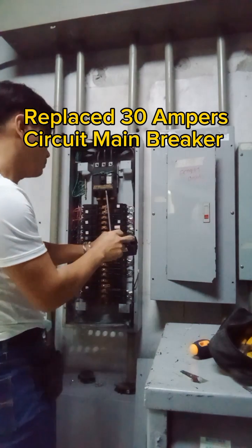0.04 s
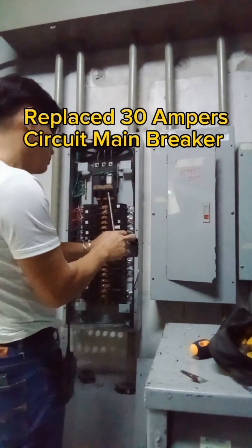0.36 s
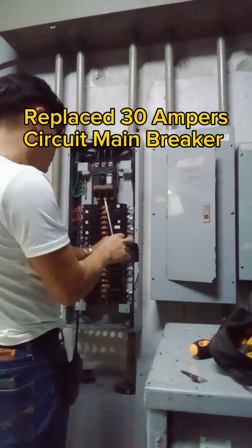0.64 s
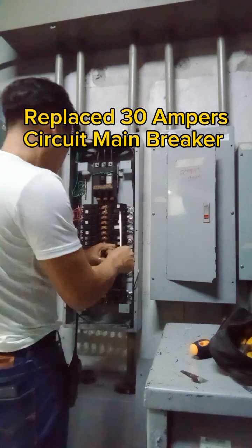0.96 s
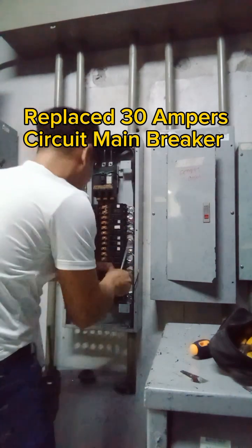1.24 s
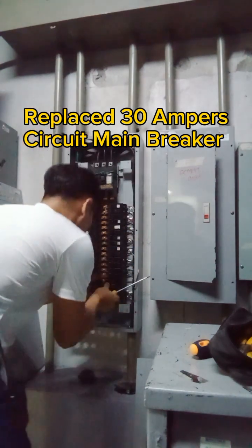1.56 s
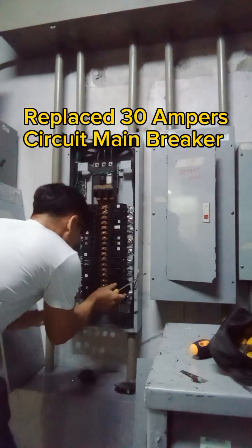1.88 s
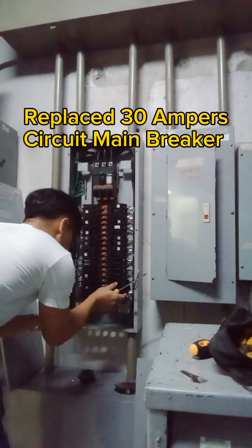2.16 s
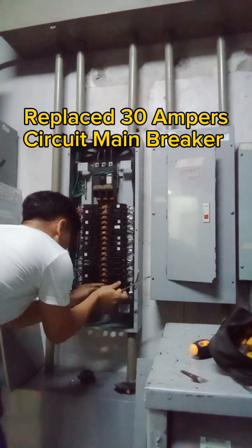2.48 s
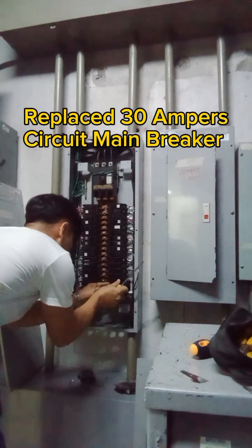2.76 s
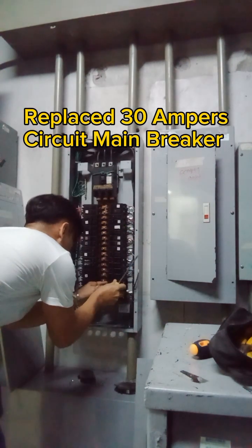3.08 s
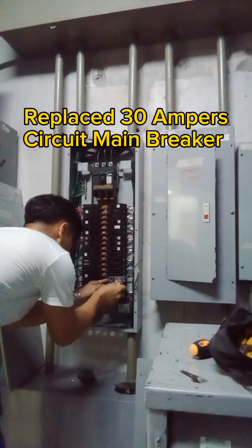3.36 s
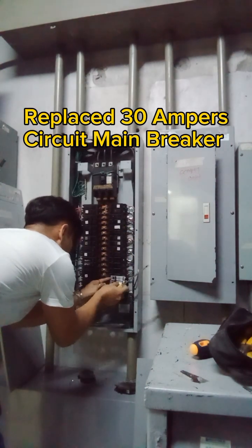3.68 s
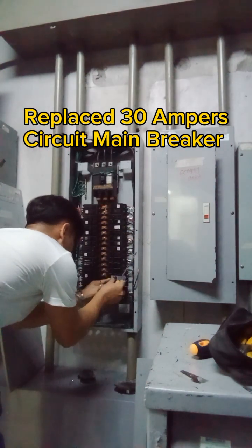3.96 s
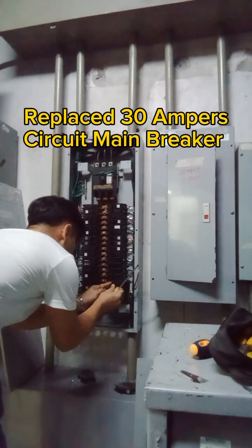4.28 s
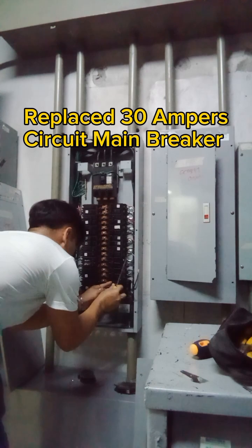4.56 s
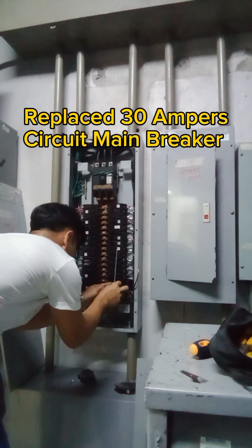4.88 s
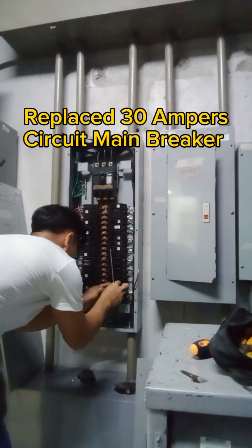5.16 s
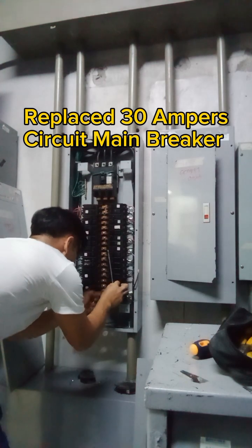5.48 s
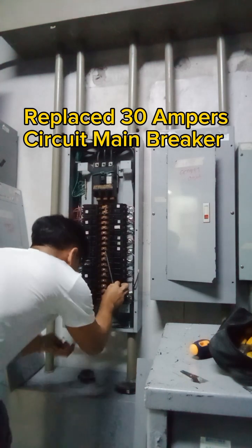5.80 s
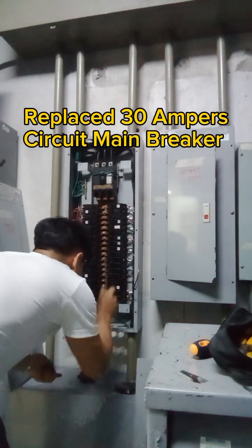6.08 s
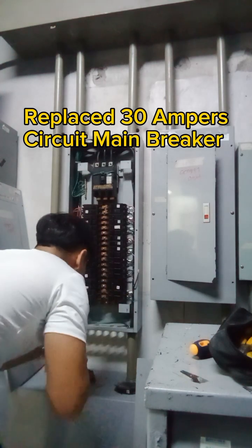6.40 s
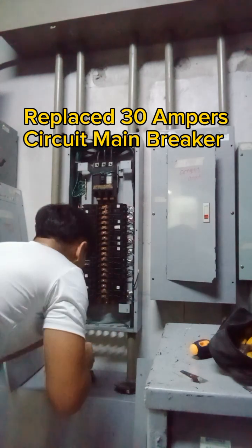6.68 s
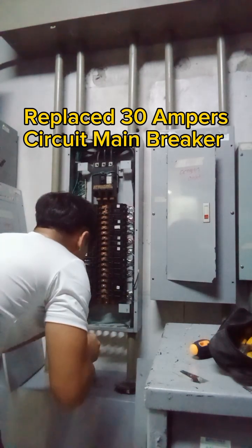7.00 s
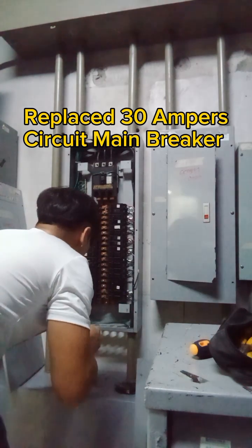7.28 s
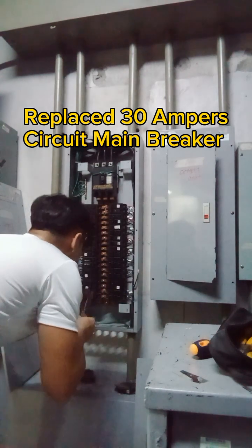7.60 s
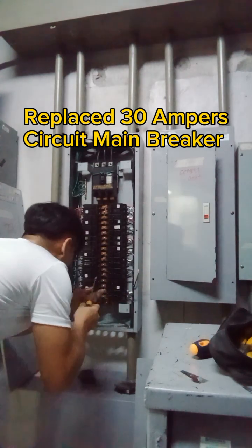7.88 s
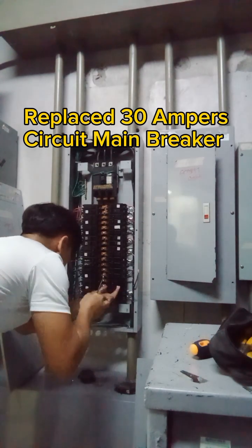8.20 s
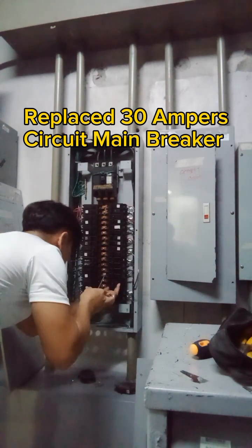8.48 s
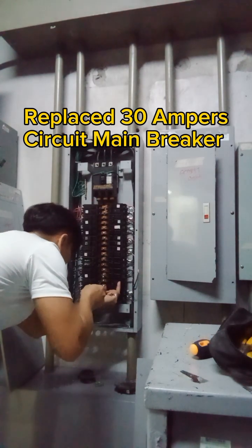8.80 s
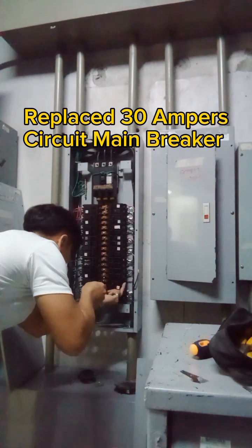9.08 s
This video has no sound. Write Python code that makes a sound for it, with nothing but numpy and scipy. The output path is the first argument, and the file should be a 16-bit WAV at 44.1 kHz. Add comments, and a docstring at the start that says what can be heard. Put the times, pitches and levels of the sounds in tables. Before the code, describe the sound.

Two sharp metal clacks and faint handling clicks sound over the constant buzzing hum of a breaker panel in a small room.

```python
"""Electrical panel in a small room.

One microphone in a hard-walled room, near a live panel whose iron hums and buzzes over dull ventilation.
A metal tool clacks twice against the panel; hands knock and click softly among the breakers.
The recorder's gain control ducks at the clacks and keeps the hum low for five seconds before it lets go.
Near the end the loose iron seats itself for a moment and its rattle eases."""
import sys
import numpy as np
from scipy import signal
from scipy.fft import rfft, irfft, next_fast_len
from scipy.io import wavfile
from scipy.ndimage import uniform_filter1d, minimum_filter1d, map_coordinates

SR = 44100
rng = np.random.default_rng(int(sys.argv[2]) if len(sys.argv) > 2 else 0)


def store_pcm(level_fs):
    """Save levels as 16-bit WAV."""
    pcm = np.round(np.clip(level_fs, -1, 1) * 32767).astype(np.int16)
    wavfile.write(sys.argv[1], SR, np.atleast_2d(pcm).T)


N = 407925
TIME = np.arange(N) / SR
MAINS_HZ, BAND_EDGE_HZ = 60.308, 15520


def gain_of(db):
    """Decibels to amplitude."""
    return 10 ** (np.asarray(db) / 20)


def unit(x):
    """Scales to an energy of one."""
    return x / np.sqrt(np.sum(x ** 2) + 1e-20)


def read(points, hz):
    """Reads a spectrum table on a log-frequency axis."""
    table_hz, value = np.transpose(points)
    return np.interp(np.log(hz + 1), np.log(table_hz + 1), value)


def add(mix, start_s, sound):
    """Mixes a sound in, in place."""
    part = mix[round(start_s * SR):][:len(sound)]
    part += sound[:len(part)]


def tinted(x, points):
    """Filters by a spectrum table with minimum phase, so that attacks stay sharp."""
    size = next_fast_len(len(x) + 4096)
    hz = abs(np.fft.fftfreq(size, 1 / SR))
    log_gain = np.log(gain_of(read(points, hz)))
    response = np.exp(np.conj(signal.hilbert(log_gain)))
    return np.fft.ifft(np.fft.fft(x, size) * response).real[:len(x)]


def drift(shape, size):
    """Random values of rms one that change smoothly over about size rows."""
    noise = rng.standard_normal(shape)
    for _ in range(2):
        noise = uniform_filter1d(noise, size, axis=0, mode="wrap")
    return noise / noise.std()


def held(x, seconds):
    """Holds each peak for the given time."""
    size = round(seconds * SR)
    return -minimum_filter1d(-x, size, mode="constant", origin=(size - 1) // 2)


def reflections():
    """The tail off the hard walls: noise that dies at its own speed in each band; energy one."""
    # The room's decay. Each row: frequency in Hz, seconds to fall 60 dB.
    decay_times = [(200, 0.38), (1000, 0.46), (3000, 0.58), (6000, 0.52), (10000, 0.42), (15000, 0.4)]
    hz, t, bands = signal.stft(rng.standard_normal(SR * 3 // 4), SR, nperseg=256)
    fade = gain_of(-60 * t / read(decay_times, hz)[:, None])
    return unit(signal.istft(bands * fade, SR, nperseg=256)[1])


def room(wet_db):
    """The path to the microphone: direct sound, then the walls' reflections."""
    path = gain_of(wet_db) * reflections()
    path[0] += 1
    return unit(path)


def ventilation(swell_db=-1.1, top_hz=2300):
    """Moving air and distant machinery: a soft, dull rush behind the hum."""
    # The rush's spectrum. Each row: frequency in Hz, level in dB.
    spectrum = [(25, -83.5), (60, -86), (110, -70.5), (220, -69.5), (330, -74.5), (470, -68.5), (700, -68),
                (1100, -65.5), (1700, -73), (2200, -75)]
    rush = tinted(rng.standard_normal(N) * np.sqrt(SR / 2), spectrum)
    rush = signal.sosfilt(signal.butter(3, top_hz, fs=SR, output="sos"), rush)
    return rush * gain_of(swell_db * drift(N, size=SR // 3))


def seated(t, from_s=8.1, until_s=8.95, seat_s=0.3, unseat_s=0.16):
    """How firmly the panel's iron sits, from 0 (loose) to 1."""
    return np.clip(np.minimum((t - from_s) / seat_s, (until_s - t) / unseat_s), 0, 1)


def looseness_db(t, loose_db=2.5, firm_db=-6):
    """Gain of the uneven part of the iron's slapping: it falls as the iron seats itself."""
    return loose_db + (firm_db - loose_db) * seated(t)


def hum_levels(multiples):
    """Levels in dB of the magnetised iron's tones, at multiples of the mains frequency."""
    # Even multiples, from the iron flexing twice a cycle. Each row: frequency in Hz, level in dB.
    even = [(120, -33.5), (360, -34), (840, -40), (1200, -40), (1450, -44.5), (1930, -38), (2050, -52.5),
            (2290, -39.5), (2600, -40), (3250, -50.5), (3380, -40), (3600, -54), (4000, -54)]
    # Odd multiples, from unequal half cycles. Each row: frequency in Hz, level in dB.
    odd = [(60, -69.5), (300, -55), (540, -39), (670, -48), (1030, -47.5), (1270, -45), (2100, -41.5),
           (2230, -57), (2850, -38.5), (3400, -44.5), (3900, -41)]
    # Overtones the cabinet radiates strongly. Each row: multiple, level in dB.
    strong_tones = [(3, -39), (4, -23), (7, -37), (8, -24), (10, -26), (12, -27), (16, -29), (18, -27),
                    (19, -34), (22, -29), (25, -35), (26, -35), (27, -37), (28, -28.5)]
    hz = multiples * MAINS_HZ
    db = np.where(multiples % 2, read(odd, hz), read(even, hz))
    for multiple, strong_db in strong_tones:
        db[multiples == multiple] = strong_db
    return db


def buzz_lines(multiples, back_slap=0.63, ring_s=0.003, wash=0.52, size=4096):
    """Harmonics of loose iron slapping twice a cycle, unequally, over a wash of reflections."""
    # The buzz above the hum. Each row: frequency in Hz, level of the lines there in dB.
    spectrum = [(4100, -58.5), (4500, -46), (4900, -46), (5450, -39.5), (6100, -49.5), (6900, -51),
                (7600, -69), (8800, -64), (10000, -66), (11000, -77), (12000, -64), (13500, -85),
                (15300, -83)]
    t = np.arange(size) / size / MAINS_HZ
    ring = rng.standard_normal(size) * np.exp(-t / ring_s)
    cycle = ring + back_slap * np.roll(ring, size // 2) + wash * rng.standard_normal(size)
    lines = rfft(cycle)[multiples.astype(int)]
    local_rms = np.sqrt(uniform_filter1d(abs(lines) ** 2, size=7))
    return lines / local_rms * gain_of(read(spectrum, multiples * MAINS_HZ))


def panel_hum(hum_top_hz=4000, wander=0.079, wander_hz=1400, firming=0.14, frames=186, size=4096):
    """A repeating mains cycle of hum and buzz; it wavers as a body moves through the standing waves."""
    # Where the worker stands in those waves. Each row: time in seconds, position from -1 to 1.
    stance = [(0, -0.68), (2.7, -0.93), (5.3, -0.14), (8, 0.73), (9.25, 1)]
    # Overtones this movement lifts or shades. Each entry: mains multiple, dB per unit of position.
    shaded = {18: 0.43, 22: 0.75, 28: -3, 32: 7}
    multiples = np.arange(1, BAND_EDGE_HZ // MAINS_HZ + 1)
    hz, t = multiples * MAINS_HZ, np.linspace(0, N / SR, frames)
    is_hum = hz < hum_top_hz
    lines = buzz_lines(multiples)
    lines[is_hum] = gain_of(hum_levels(multiples[is_hum])) * np.exp(1j * np.angle(lines[is_hum]))
    depth = wander * np.minimum(hz / wander_hz, 3)  # short waves feel the movement most
    shape = (frames, len(hz))
    lines = lines * (1 + depth * (drift(shape, size=25) + 1j * drift(shape, size=25)))
    position = np.interp(t, *np.transpose(stance))
    for multiple, db in shaded.items():
        lines[:, round(multiple) - 1] *= gain_of(db * position)
    # seated iron slaps evenly, so the buzz's lines stand out, and one leaf sings 3 dB above them
    lines[:, ~is_hum] *= gain_of(-firming * looseness_db(t))[:, None]
    whine_band = np.exp(-((hz - 5470) / 150) ** 2)
    lines *= gain_of(3 * np.outer(seated(t), whine_band))
    # one cycle a frame, read round at the mains rate while the frames blend
    cycles = irfft(np.pad(lines, ((0, 0), (1, 0))), size) * size / np.sqrt(2)
    cycles = np.hstack([cycles, cycles[:, :1]])
    frame, phase = np.linspace(0, frames - 1, N), TIME * MAINS_HZ % 1
    return map_coordinates(cycles, [frame, phase * size], order=1)


def iron_rattle(leaves=4, sway=0.31, low_hz=2000):
    """No two slaps are alike: their sizes sway and jump, and spread noise between the buzz's lines."""
    # The uneven part of the slapping. Each row: frequency in Hz, level in dB.
    spectrum = [(2200, -78.5), (2900, -73), (3600, -76.5), (4150, -83), (4700, -72), (5300, -67.5),
                (6000, -71.5), (7000, -86.5), (7700, -85), (9000, -95.5), (12000, -92), (15000, -103)]
    half_cycles = np.round(np.arange(0, N - 200, SR / MAINS_HZ / 2)).astype(int)
    count, rattle = len(half_cycles), np.zeros(N)
    for lag in rng.integers(0, 160, size=leaves):  # each loose leaf slaps at its own moment
        slaps = np.zeros(N)
        slaps[half_cycles + lag] = rng.uniform(-1, 1, count) + sway * drift(count, size=6)
        rattle += signal.oaconvolve(slaps, room(wet_db=6))[:N]
    rattle = tinted(unit(rattle) * np.sqrt(N * SR / 2), spectrum)
    rattle = signal.sosfilt(signal.butter(2, low_hz, "high", fs=SR, output="sos"), rattle)
    return rattle * gain_of(looseness_db(TIME))


def steel_blow(ring_db=-8, crack_s=0.0018, early_db=2, early_s=0.034, wet_db=1):
    """A short crack, its early echoes off the cabinets, the room's tail and ringing steel; energy one."""
    # The colour of a clack. Each row: frequency in Hz, relative level in dB.
    colour = [(300, -34), (700, -31), (1100, -8), (1800, -7.5), (2300, -8), (3000, -2), (4100, -9.5),
              (4900, 1.5), (5700, 1), (6600, -4.5), (7700, -15.5), (10000, -16.5), (13500, -24),
              (15300, -25)]
    # Modes of tool and panel. Each row: frequency in Hz, relative level in dB, seconds to fall 60 dB.
    modes = [(1090, -8, 0.53), (1286, -17, 0.32), (1840, 0, 0.22), (2412, -16, 1), (2930, -33, 0.49),
             (3010, -16, .4), (3180, 3, 0.39), (5000, -4, 0.29), (5030, -11, 0.34), (5630, -15, 0.15),
             (5220, 14, 0.094), (6130, -4, 0.56), (6300, -12, .45), (6700, -5, 0.48), (8200, -19, .35)]
    t = np.arange(SR // 2) / SR
    crack = unit(rng.standard_normal(len(t)) * np.exp(-t / crack_s))
    early = unit(rng.standard_normal(len(t)) * np.exp(-t / early_s))
    tail = reflections()[:len(t)]
    burst = tinted(crack + gain_of(early_db) * early + gain_of(wet_db) * tail, colour)
    ring = sum(gain_of(db - 60 * t / t60) * np.sin(2 * np.pi * (hz * t + rng.random()))
               for hz, db, t60 in modes)
    return unit(unit(burst) + gain_of(ring_db) * unit(ring))


def fumbles(count=9, from_s=1.4, until_s=5.4, knock_db=-33.5, click_db=-35, decay_s=0.012):
    """Faint random contacts of hands in the box, on parts pitched from 600 to 1500 Hz."""
    step_s = (until_s - from_s) / count
    return [(from_s + (i + when) * step_s, knock_db, click_db, decay_s, 600 + 900 * pitch)
            for i, (when, pitch) in enumerate(rng.random((count, 2)))]


def breaker_touches(knock_gain_db=34, click_gain_db=32, part_db=1, part_s=0.0035, soft_hz=9000):
    """Each contact is a short scuff that knocks the box and a part in it, and clicks softly on steel."""
    # The clearer contacts. Each row: start in seconds, relative knock and click levels in dB,
    # the scuff's decay in seconds, the knocked part's pitch in Hz.
    contacts = [ (0.345, -44, -22.5, 0.0035, 1500), (0.949, -39, -24, 0.024, 1200),
                (2.553, -26, -38, 0.0054, 1480), (3.17, -29, -36, .006, 1530), (3.215, -29, -29, .03, 2900),
                (3.437, -25.5, -41, 0.0047, 1390), (3.446, -28, -40, .012, 704),
                (3.495, -28, -41, .008, 560), (3.567, -38, -30, 0.013, 2800),
                (4.485, -33, -31, 0.017, 1100), (5.062, -27, -27, .006, 1530),
                (5.074, -30, -26, 0.0095, 500)]
    # The breaker box when knocked. Each row: frequency in Hz, relative level in dB.
    box_colour = [(40, -31), (200, -2), (330, -10), (480, 7), (750, 0), (1000, -5), (1600, -10),
                  (2200, -16), (3000, -11), (4200, -34), (12000, -51)]
    out, t = np.zeros(N), np.arange(SR // 5) / SR
    soften = signal.butter(2, soft_hz, fs=SR, output="sos")
    for start_s, knock_db, click_db, decay_s, hz in contacts + fumbles():
        scuff = signal.sosfilt(soften, rng.standard_normal(len(t)) * np.exp(-t / decay_s))
        part_ring = np.exp(-t / part_s) * np.cos(2 * np.pi * hz * t)
        part = signal.fftconvolve(scuff, part_ring)[:len(t)]
        knock = unit(tinted(scuff, box_colour)) + gain_of(part_db) * unit(part)
        knock = unit(signal.fftconvolve(knock, room(wet_db=1)))
        click = unit(signal.fftconvolve(scuff, steel_blow()))
        add(out, start_s, gain_of(knock_db + knock_gain_db) * knock)
        add(out, start_s, gain_of(click_db + click_gain_db) * click)
    return out


def tool_clacks(gain_db=34):
    """The metal tool hits the panel twice, each time in a quick cluster of rebounds."""
    # Strikes and rebounds. Each row: start in seconds, relative level in dB.
    strikes = [(0.5826, -7.5), (0.592, -12.5), (0.606, -15), (1.0065, -16), (1.0091, -1.5), (1.021, -13.5),
               (1.0325, -17), (1.1, -21)]
    out = np.zeros(N)
    for start_s, db in strikes:
        add(out, start_s, gain_of(db + gain_db) * steel_blow())
    return out


def scene():
    """Everything reaches one microphone, which feeds both channels."""
    microphone = panel_hum() + iron_rattle() + ventilation() + tool_clacks() + breaker_touches()
    return np.tile(microphone, (2, 1))


def gain_control(x, ceiling_db=-10, ahead_s=0.018, hold_s=0.037, long_cut_db=6.0, long_hold_s=5.148,
                 release_db_per_s=58, start_db=2.0, settle_s=1.0):
    """A look-ahead limiter; part of each cut is held for seconds, and the gain settles after switch-on."""
    power_db = 10 * np.log10(abs(uniform_filter1d(x[0] ** 2, size=220)) + 1e-12)
    over_db = np.maximum(power_db - ceiling_db, 0)
    over_db = np.interp(TIME + ahead_s, TIME, over_db)
    brief_db = held(over_db, hold_s + ahead_s)
    lasting_db = held(np.minimum(over_db, long_cut_db), long_hold_s)
    cut_db = np.maximum(brief_db, lasting_db)
    ramp_db = release_db_per_s * TIME
    cut_db = np.maximum.accumulate(cut_db + ramp_db) - ramp_db  # cuts let go at the release rate
    cut_db = np.maximum(cut_db, start_db * np.exp(-TIME / settle_s))
    return x / gain_of(uniform_filter1d(cut_db, size=100))


def record(dry):
    """The recorder: gain control, a soft ceiling on the highest peaks, then the band limit."""
    ducked = gain_control(dry)
    rounded = ducked / (1 + (ducked / 0.85) ** 8) ** (1 / 8)
    lowpass = signal.firwin(1023, BAND_EDGE_HZ, window=("kaiser", 9), fs=SR)
    return signal.oaconvolve(rounded, lowpass[None], "same", axes=1)


dry = scene()
out = record(dry)
store_pcm(out)
```